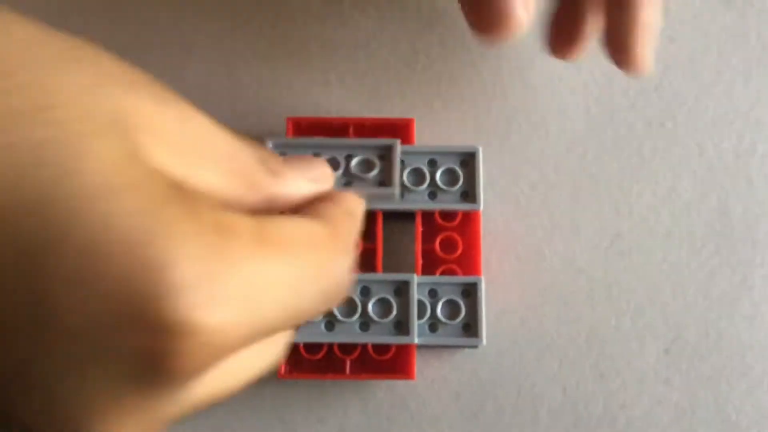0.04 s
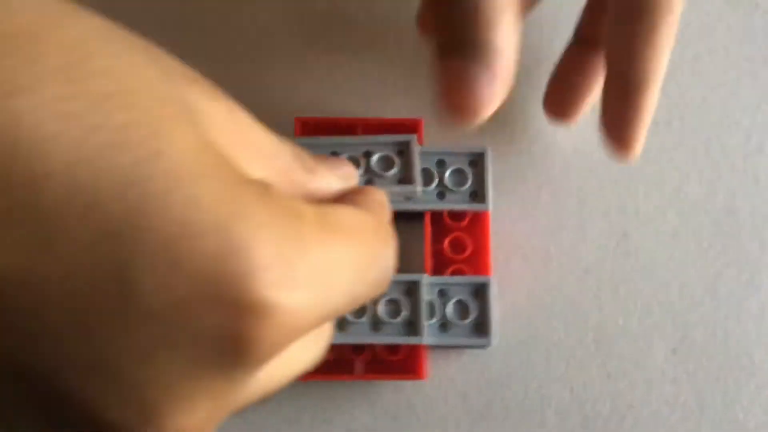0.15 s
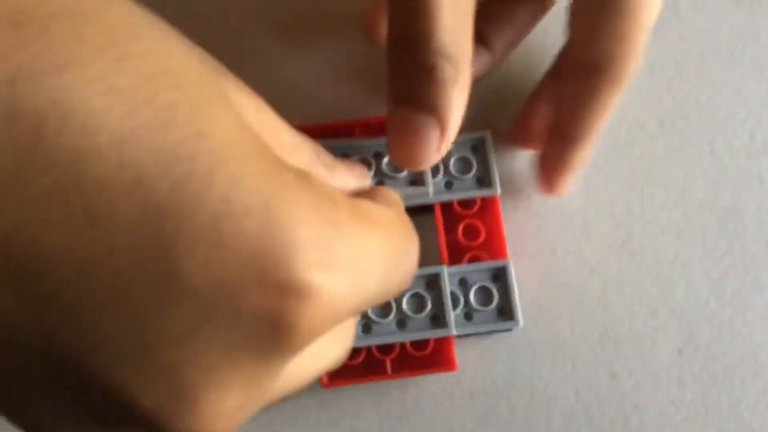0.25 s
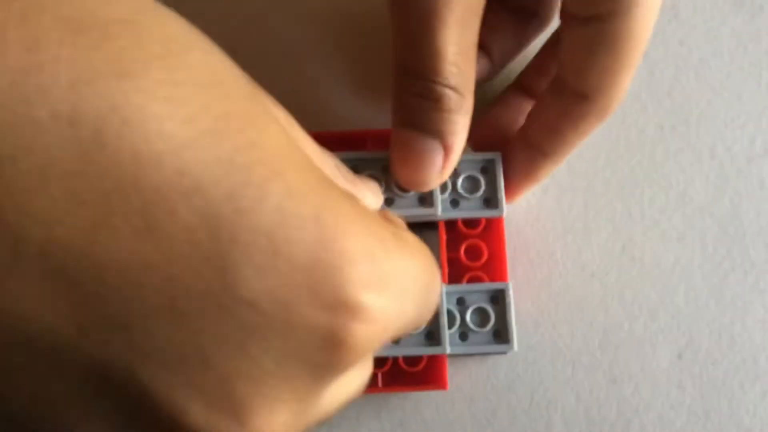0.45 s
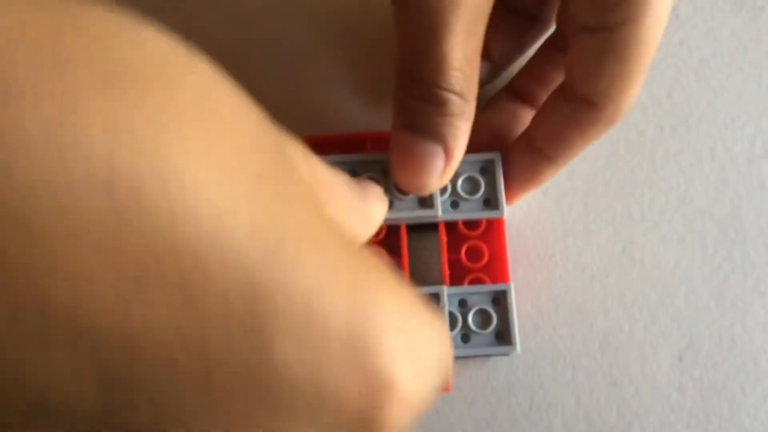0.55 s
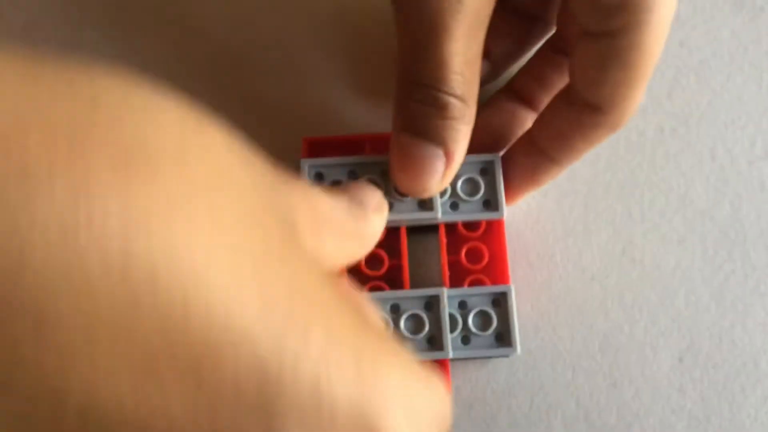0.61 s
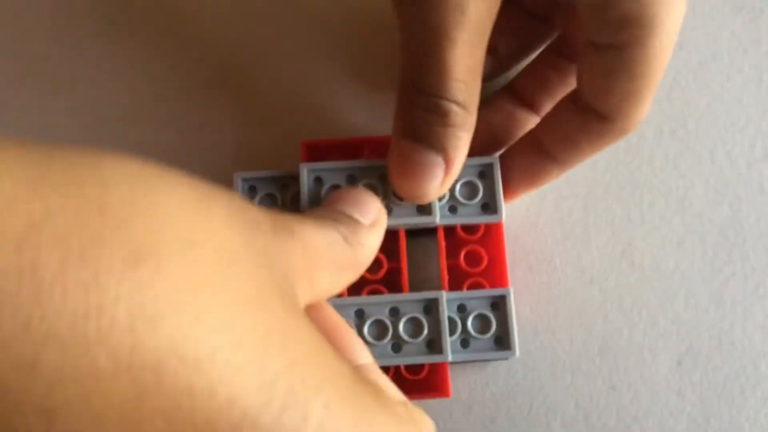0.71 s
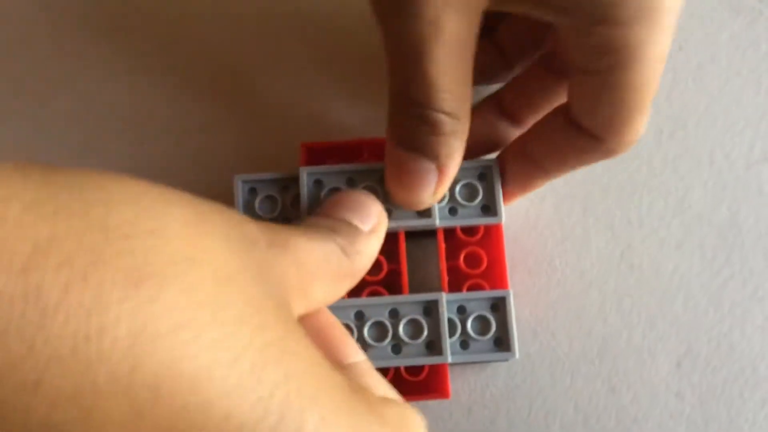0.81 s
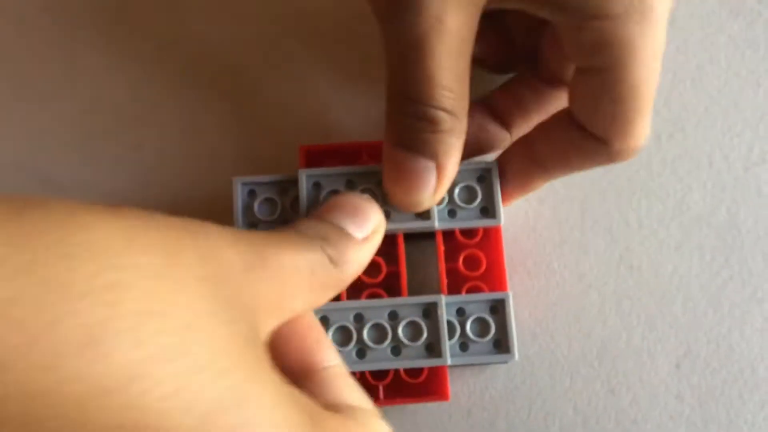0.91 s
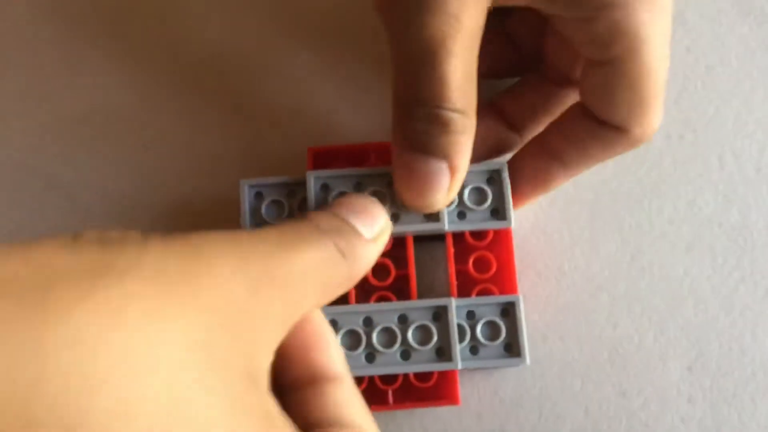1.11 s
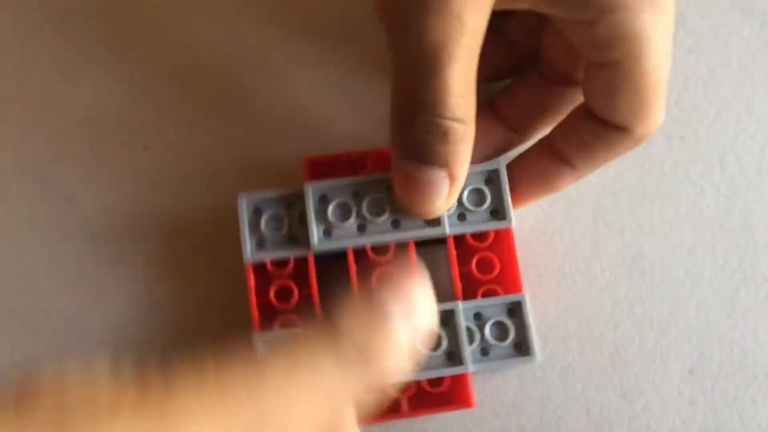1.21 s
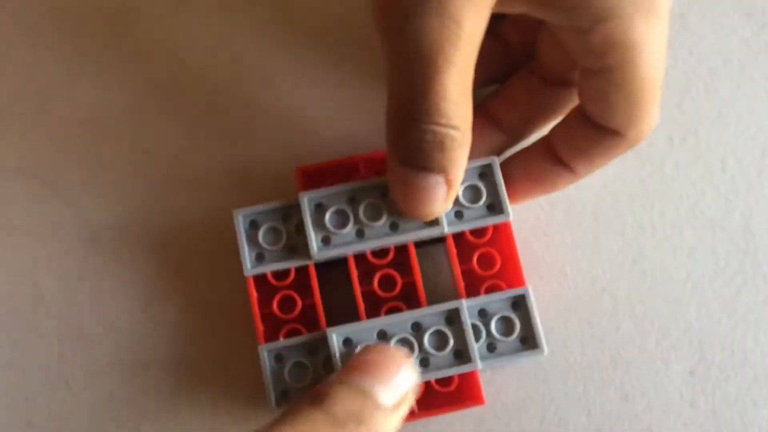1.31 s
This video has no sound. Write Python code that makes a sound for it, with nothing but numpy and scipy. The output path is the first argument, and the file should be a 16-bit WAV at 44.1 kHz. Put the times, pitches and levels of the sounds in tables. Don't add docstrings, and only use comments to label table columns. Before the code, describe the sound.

Small plastic toy bricks being fitted together, close on a hollow tabletop in a quiet room. Faint ticks at 0.1 and 0.2 seconds, a loud bright clack at 0.32, then a brief lull. From 0.5 to 0.85 stiff studs snap in with irregular sharp clicks, low thumps and soft rubbing, strongest near 0.67. A barely audible squeak at 0.9, weak taps near 1.12 and 1.33, low hush.

```python
import sys
import numpy as np
from scipy import signal
from scipy.fft import rfft, irfft
from scipy.io import wavfile
from scipy.ndimage import uniform_filter1d

SR = 44100
rng = np.random.default_rng(int(sys.argv[2]) if len(sys.argv) > 2 else 0)


def waveform_to_disk(signal):
    frames = np.transpose(np.atleast_2d(signal))
    scaled = np.clip(frames, -1, 1) * 32767
    samples = np.round(scaled).astype(np.int16)
    wavfile.write(sys.argv[1], SR, samples)


def gain_from_decibels(decibels):
    exponent = np.asarray(decibels, float) / 20
    return 10 ** exponent


N = 59535

# freq_hz, density_db [dB per Hz]
HUSH_SPECTRUM = [(50, 17.5), (300, 6.5), (700, -28.5), (1500, -39), (3500, -24.5), (9000, -20.5),
                 (15000, -35.5), (16500, -44)]
# time_s, level_db
RUB_PRESSURE = [(0, -72.5), (.1, -71), (.17, -61), (.22, -56), (.3, -53), (.38, -53.5), (.45, -64.5),
                (.55, -58), (.7, -51), (.76, -53.5), (.88, -62.5), (.95, -68.5), (1.08, -71), (1.2, -63),
                (1.3, -67), (1.35, -68)]
# time_s, level_db
SLIDE_LEVEL = [(0, -89.5), (.1, -80.5), (.18, -79), (.2, -68.5), (.25, -79), (.31, -67), (.38, -75),
               (.45, -71.5), (.55, -76), (.65, -78.5), (.74, -68), (.78, -67), (.82, -70.5), (.88, -82),
               (1.1, -84), (1.19, -80.5), (1.23, -73), (1.3, -85)]
# freq_hz, level_db, t60_s
BOARD_MODES = [(191.1, -12.5, 0.53), (233, -9, 0.22), (286.2, 0, 0.073), (327, -25, 0.15), (370, -1, 0.051),
               (437.6, -10, 0.064), (514, -10.5, 0.032), (632.5, -9.5, 0.041), (801, -27.5, 0.044),
               (963, -15, 0.07)]
# freq_hz, level_db, t60_s
BASS_MODES = [(86.5, 0.031, 0.12), (126.66, 0.022, 0.25)]
# start_s, board_db, first_bass_db, second_bass_db
THUMPS = [(.106, -53.5, -50, -63), (0.1874, -41.5, -66, -75), (0.212, -42, -80, -71),
          (0.236, -49.5, -57, -65), (.281, -45.5, -43, -47), (0.3285, -29.5, -72, -66),
          (0.356, -38.5, -44, -61), (.473, -42, -45, -80), (0.512, -38, -43.5, -67),
          (0.570, -36, -37.5, -51), (.62, -36, -33.5, -40.5), (0.670, -28.5, -26.5, -80),
          (0.6926, -32, -42.5, -85), (0.7314, -32.5, -31.5, -34), (0.774, -54, -40, -45),
          (0.8005, -35, -60, -52), (.81, -36.5, -40, -29.5), (0.828, -41.5, -57, -68),
          (.87, -45.5, -38.5, -49), (.125, -52.5, -48, -61.5), (1.245, -55.5, -55, -75),
          (.337, -34.5, -73, -67), (.346, -49, -66, -62), (0.7024, -43.5, -36, -42), (.68, -39, -45, -36),
          (.3, -43, -52, -48), (0.287, -47.5, -52, -56), (.369, -39, -66, -62), (0.847, -67, -63, -32),
          (0.995, -68, -41, -53.5), (1.131, -52.5, -53, -60.5), (1.199, -60, -63, -50.5),
          (1.155, -82, -71, -68), (1.34, -45, -50.5, -62)]
# freq_hz, level_db, t60_s
LOOSE_WALLS = [(1010, -27, 0.081), (1520, -48, 0.27), (1746, -2, 0.081), (2110, 3, 0.076),
               (3150, 13, 0.0074), (3730, 5.5, 0.011), (4790, 1.5, 0.039), (5195, 5.5, 0.014),
               (6000, 9, 0.0026), (7240, -5, .015), (9060, 13, 0.0017), (11360, 6, 0.0022),
               (14800, 0, 0.008)]
# freq_hz, level_db, t60_s
PRESSED_WALLS = [(1050, -1, 0.09), (1850, 0, 0.053), (2340, 3, 0.022), (3000, 10, 0.09), (3820, 6.5, 0.02),
                 (5110, 2, 0.015), (5510, 4.5, 0.028), (7600, -23, 0.005), (4670, -14, 0.018),
                 (8440, 3.5, 0.0057), (9640, 7, 0.0059), (11200, -3, 0.0039), (12300, 4, 0.0036),
                 (15200, 4.5, 0.0033)]
# start_s, level_db, ring_hz [hollow ring], treble_db, rattle_ms
TAPS = [(.0895, -71, 2125, 10, 1), (.1048, -44.5, 4790, 11.5, 1.5), (.1062, -44.5, 1683, -27, 3.1),
        (.1078, -45.5, 2080, -6, 2.13), (.1875, -55, 3000, -13, 2), (.2066, -49, 4530, -1, 0.83),
        (.2105, -54.5, 2940, -30, 2.9), (.2285, -59, 2830, -9, 4), (.2563, -53, 1850, -71, 2.5),
        (.2806, -50, 2880, -8, 1.7), (.287, -53.5, 2980, -11, 2.6), (.3221, -24, 4970, 4.5, 1.7),
        (.3245, -29.5, 2180, -5, 0.66), (.3288, -31, 3730, -7, 2.4), (.3325, -36, 2310, -19, 1.1),
        (.3355, -45.5, 2930, -27, 8.5), (1.1084, -54, 3230, -27, 1.9), (1.118, -49.5, 4550, 4, 1.3),
        (1.1222, -56, 4340, 22, 2.2), (1.1293, -43.5, 11100, 6, 0.57), (1.1325, -60.5, 2170, -6, 3.1),
        (1.157, -61, 1920, -20, 0.39), (1.3345, -60.5, 2890, 3, 3.3)]
# start_s, level_db, ring_hz, treble_db, rattle_ms
SLIPS = [(.4728, -50, 3120, -7, 0.49), (.5108, -48.5, 5100, 4.5, 1.8), (.5695, -36, 5370, 13, 1.34),
         (.6186, -36.5, 1900, 7.5, 0.89), (.6688, -29.5, 8600, 10.5, 0.84), (.671, -38.5, 3000, -7, 1.2),
         (.68, -57, 7950, 8, 2.1), (.691, -35, 8440, 8, 1.9), (.6935, -37, 1850, -22, 2.2),
         (.7014, -42.5, 4830, 12, 1.7), (.7148, -46.5, 9000, 18, 1.4), (.7284, -32.5, 5430, 9.5, 0.92),
         (.732, -38, 2980, -10, 2.4), (.7385, -47.5, 1820, -15, 2.2), (.755, -44, 7300, 9, 1),
         (.7612, -75, 5280, 11, 0.87), (.7686, -47.5, 3700, 2, 1), (.7715, -51, 5330, -6, .6),
         (.7762, -50, 7960, -11, 0.87), (.779, -47.5, 3020, -28, 0.67), (.7914, -60, 4100, -8, 1),
         (.8, -31.5, 7450, 10, 1.7), (.8036, -36.5, 4230, 5, 1), (.808, -44.5, 3060, -32, 1.2),
         (.8535, -56, 7900, 2, 1.3)]


def curve(table, t):
    return np.interp(t, *np.array(table).T[:2])


def unit(x):
    return x / np.sqrt(np.mean(x ** 2))


def walk(per_second):
    hold = int(SR / per_second)
    levels = np.repeat(rng.standard_normal(N // hold + 1), hold)
    return unit(uniform_filter1d(levels, hold)[:N])


def ring(x, hz, t60):
    decay = np.log(1000) / (max(t60, .002) * SR)
    pole = np.exp(2j * np.pi * hz / SR - decay)
    return signal.lfilter([1], [1, -pole], x).imag


def body(x, modes):
    return sum(gain_from_decibels(db) * ring(x, hz, t60) for hz, db, t60 in modes)


def hush():
    f = np.maximum(np.fft.rfftfreq(N, 1 / SR), 1)
    hz, db = np.array(HUSH_SPECTRUM).T
    gain = gain_from_decibels(np.interp(np.log(f), np.log(hz), db))
    level = gain_from_decibels(-65.5 + walk(6))
    return level * unit(irfft(rfft(rng.standard_normal(N)) * gain, N))


def room(x):
    wall_db, wall_t60_s, wall_hz = -22, 0.25, 5840
    near_db, near_t60_s = -16.5, 0.029
    t = np.arange(SR // 2) / SR
    far, near = rng.standard_normal((2, len(t))) * (t > .001)
    dull = signal.butter(4, wall_hz, fs=SR, output="sos")
    far = signal.sosfilt(dull, far * gain_from_decibels(-60 * t / wall_t60_s))
    near = near * gain_from_decibels(-60 * t / near_t60_s)
    tail = gain_from_decibels(wall_db) * far / np.linalg.norm(far) + gain_from_decibels(near_db) * near / np.linalg.norm(near)
    return signal.fftconvolve(x, tail)[:N]


def rubbing(t):
    grains_hz, bass_db, air_db, wall_damping = 335.3, -12, -4.5, 0.093
    chance, size = rng.random((2, N))
    grains = (chance < grains_hz / SR) * (size - .5) * 20 + rng.standard_normal(N)
    drive = grains * gain_from_decibels(curve(RUB_PRESSURE, t) + 2.5 * walk(40))

    def shaken(modes):
        return body(drive, modes) / np.std(body(grains, modes))

    fine = rng.standard_normal(N)
    damped = [(hz, db, wall_damping * t60) for hz, db, t60 in LOOSE_WALLS[:8]]
    rustle = unit(body(fine, damped)) + gain_from_decibels(air_db) * fine
    slide = gain_from_decibels(curve(SLIDE_LEVEL, t) + 2.0 * walk(90))
    return shaken(BOARD_MODES) + gain_from_decibels(bass_db) * shaken(BASS_MODES) + slide * rustle


def squeak(t):
    centre_s, length_s, pitch_hz, level_db = .909, .012, 3050, -67
    pitch = pitch_hz * (1 + .024 * walk(400) - .6 * (t - centre_s))
    tone = np.sin(2 * np.pi * np.cumsum(pitch) / SR) * gain_from_decibels(4 * walk(300))
    return gain_from_decibels(level_db) * tone * np.exp(-((t - centre_s) / length_s) ** 2)


def pushes(column, ms):
    x = np.zeros(N)
    for row in THUMPS:
        x[int(row[0] * SR)] = gain_from_decibels(row[column])
    shape = np.hanning(max(int(ms * SR / 1000), 4))
    return np.convolve(x, shape / shape.sum())[:N]


def table():
    swell_s = 0.0096
    out = -.5 * body(pushes(column=1, ms=0.85), BOARD_MODES)
    for column, mode in enumerate(BASS_MODES, start=2):
        bass = body(pushes(column, ms=2.68), [mode])
        out = out + ring(bass, mode[0], swell_s) * 14 / (swell_s * SR)
    return out


def rattle(noise, ms):
    rise_ms = 0.9
    t_ms = np.arange(len(noise)) * 1000 / SR
    fade = np.exp(-np.maximum(t_ms - rise_ms, 0) / np.clip(ms, .2, 8))
    shape = np.minimum(t_ms / rise_ms, 1) ** 2 * fade
    x = noise * shape
    for _ in range(4):
        flat = irfft(np.exp(1j * np.angle(rfft(x))))
        flat = flat / np.linalg.norm(flat) * np.linalg.norm(shape)
        x = np.clip(flat, -2 * shape, 2 * shape)
    return x


def touches(events, walls, grip):
    ring_db, ring_t60_s, crack_db, treble_hz = 10.5, .032, 13, 5600
    scatter_db, wobble, longest_s = 1.5, .008, .028
    size = 4096
    out = np.zeros(N + size)
    noises = rng.standard_normal((30, size))
    chances = rng.standard_normal((30, len(walls), 2))
    below_treble = signal.butter(4, treble_hz, fs=SR)
    crack_band = signal.butter(3, 1700, "high", fs=SR)
    for (start_s, level_db, hz, treble_db, ms), noise, chance in zip(events, noises, chances):
        hit = rattle(noise, ms)
        low = signal.lfilter(*below_treble, hit)
        crack = signal.lfilter(*crack_band, low + gain_from_decibels(treble_db) * (hit - low))
        hollow = ring(hit, hz, grip * ring_t60_s * min(1, 4000 / hz))
        y = gain_from_decibels(ring_db) * hollow + gain_from_decibels(crack_db) * crack * 2
        for (wall_hz, wall_db, t60), (a, b) in zip(walls, chance):
            lift_db = treble_db / (1 + (treble_hz / wall_hz) ** 4)
            gain = gain_from_decibels(wall_db + lift_db + scatter_db * a)
            y += gain * ring(hit, wall_hz * (1 + wobble * b), grip * min(t60, longest_s))
        peak = np.sort(np.abs(y))[-8:].mean()
        i = int(start_s * SR)
        out[i:i + size] += gain_from_decibels(level_db) * y / peak
    return out[:N]


def taps():
    return touches(TAPS, LOOSE_WALLS, grip=.6)


def stud_slips():
    return touches(SLIPS, PRESSED_WALLS, grip=.35)


def scene():
    t = np.arange(N) / SR
    bricks = taps() + stud_slips() + squeak(t)
    mix = bricks + room(bricks) + table() + rubbing(t) + hush()
    return mix[None]


def band_limit(x):
    return signal.sosfilt(signal.butter(12, 16780, fs=SR, output="sos"), x)


def record(dry):
    bass_cut = signal.butter(4, 62.5, "high", fs=SR, output="sos")
    top_cut = signal.butter(8, 15600, fs=SR, output="sos")
    mix = signal.sosfilt(np.vstack([bass_cut, top_cut]), dry)
    return band_limit(mix)


dry = scene()
out = record(dry)
waveform_to_disk(out)
```